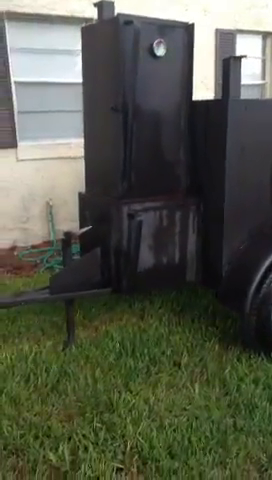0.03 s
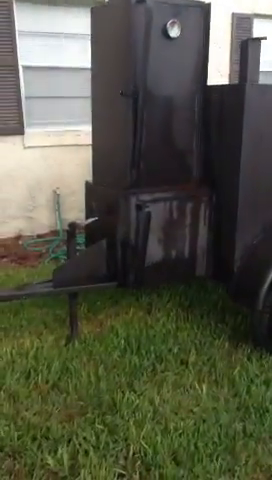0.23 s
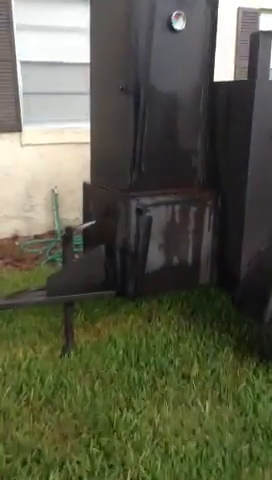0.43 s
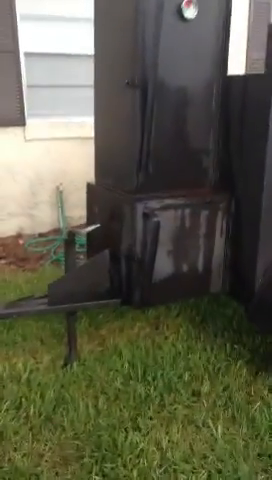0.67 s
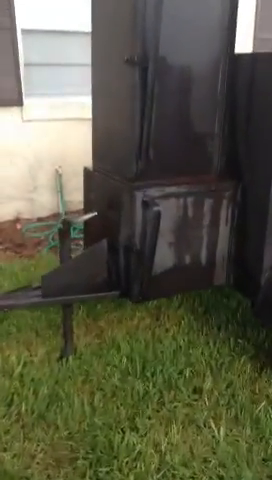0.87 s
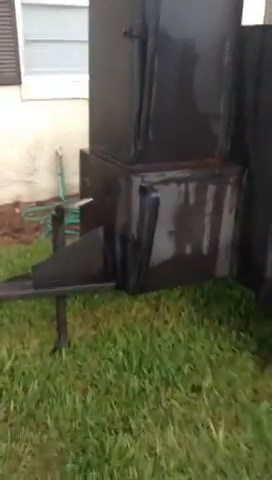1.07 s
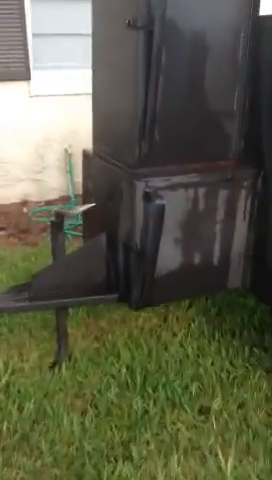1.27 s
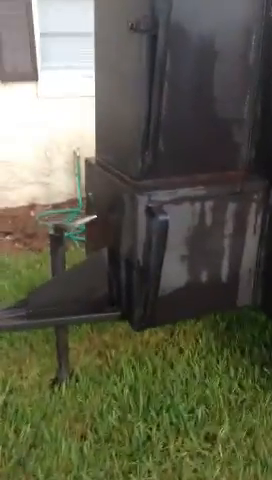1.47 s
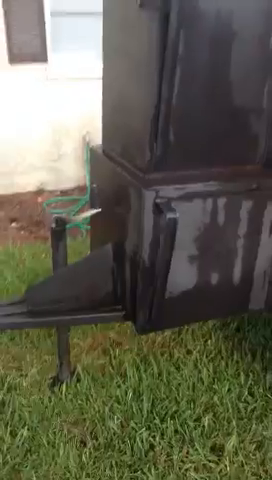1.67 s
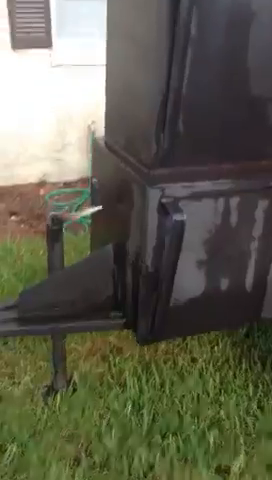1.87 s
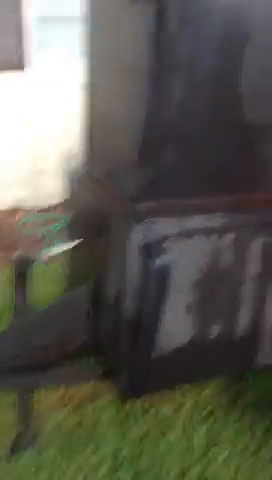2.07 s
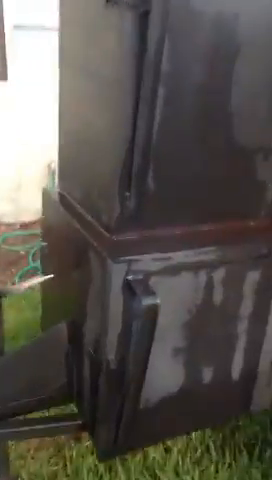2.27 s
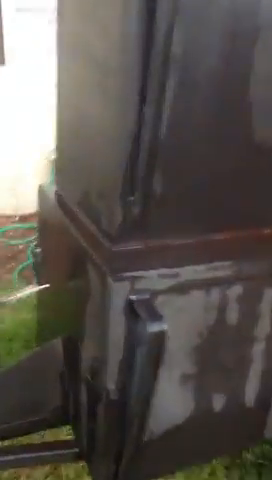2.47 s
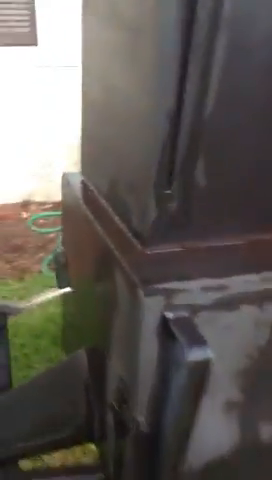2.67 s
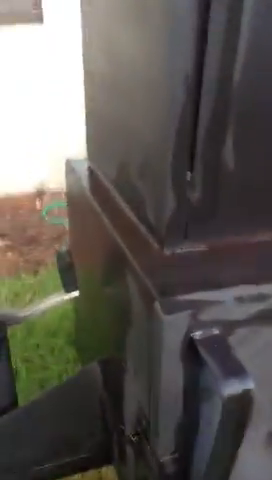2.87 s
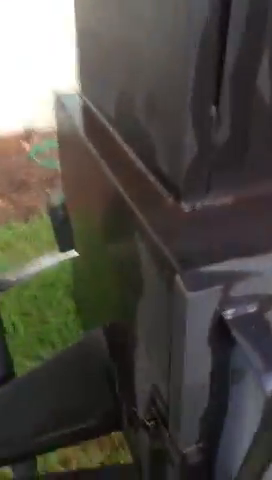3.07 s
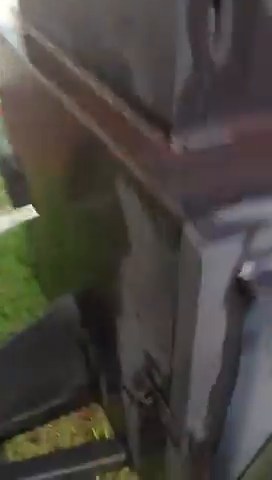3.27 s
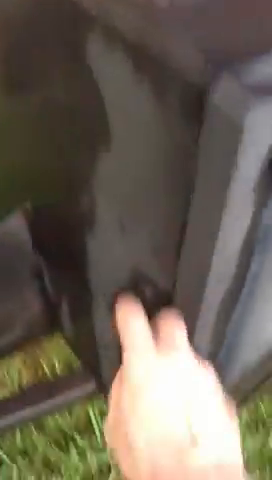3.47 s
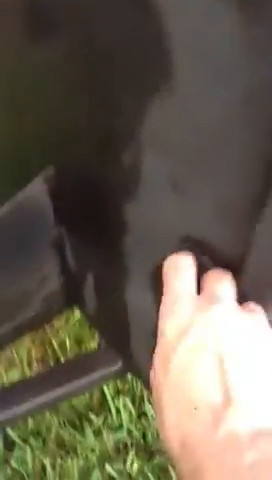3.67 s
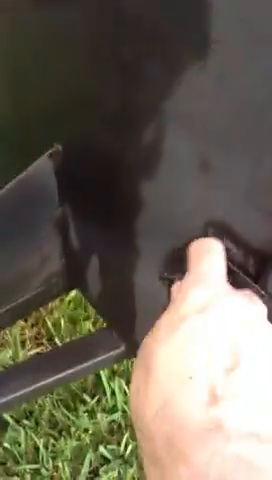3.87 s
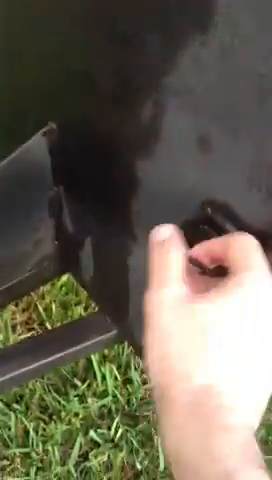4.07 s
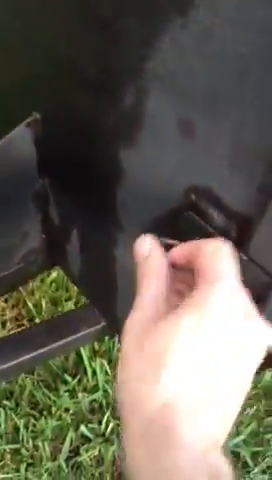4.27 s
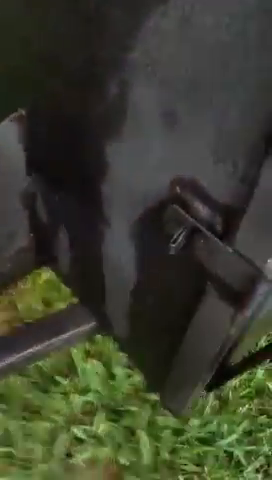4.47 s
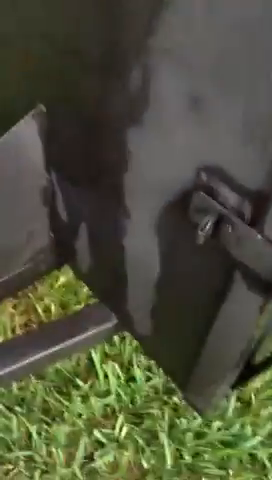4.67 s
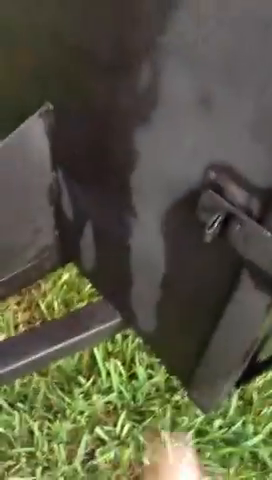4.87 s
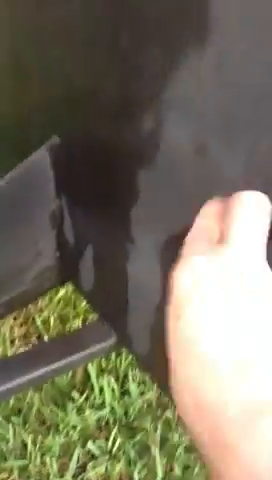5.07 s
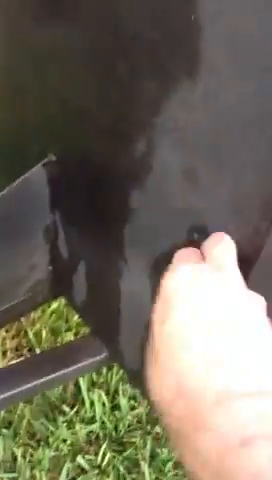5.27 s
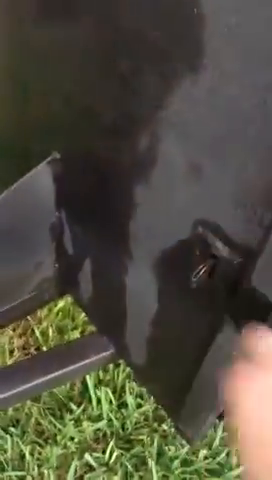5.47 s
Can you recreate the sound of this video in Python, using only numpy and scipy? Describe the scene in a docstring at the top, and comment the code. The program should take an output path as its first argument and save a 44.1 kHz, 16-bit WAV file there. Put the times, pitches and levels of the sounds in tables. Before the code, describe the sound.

A gas burner hisses evenly throughout, bright and airy, over a faint low outdoor wash. Soft swishing steps cross grass, ending in a small heel knock. Close to the microphone, a stiff steel latch ticks and scrapes, then breaks free with a loud crack and thump that rings the hollow firebox. After a pause it clanks against the loose door. Dry open air, no echo, handheld microphone.

```python
"""A gas burner hisses steadily in a steel smoker outdoors: filtered noise plus narrow pipe resonances.
Someone walks over a lawn to it: swishes of grass noise, a heel knock, short pitched noise rasps.
A hand works the firebox latch: stick-slip pulses and clicks make it grate, noise and modes ring the steel.
The latch snaps free with a crack and a filtered air push, the box rings, then the latch
clanks against the loosened door."""
import sys
import numpy as np
from scipy import signal
from scipy.fft import rfft, irfft
from scipy.io import wavfile

SR = 44100
rng = np.random.default_rng(int(sys.argv[2]) if len(sys.argv) > 2 else 0)


def to_wav(s):
    """Save 16-bit WAV."""
    ch = np.atleast_2d(s).T  # columns
    pcm = np.round(np.clip(ch, -1, 1) * 32767)  # PCM
    wavfile.write(sys.argv[1], SR, pcm.astype(np.int16))


N = 242991
TIME = np.arange(N) / SR
SNAP_S = 4.4114  # the latch snaps free

# approach to the firebox: time_s, nearness (0-1)
NEARNESS = [(0, 0), (2.2, 0.35), (3.0, 0.35), (3.7, 0.98), (5.5, 1)]


def from_db(db):
    """Decibels to amplitude gain."""
    return 10 ** (np.asarray(db) / 20)


def rms_one(x):
    """Scale to unit rms."""
    return x / np.sqrt(np.mean(x ** 2) + 1e-20)


def in_time(rows):
    """Join (time_s, value) rows by straight lines."""
    return np.interp(TIME, *np.transpose(rows))


def drift(rate_hz):
    """Random wander of unit rms: a new target rate_hz times a second, joined by lines."""
    return rms_one(np.interp(TIME * rate_hz, np.arange(2000), rng.standard_normal(2000)))


def flutter(depth_db, rate_hz):
    """Uneven gain of a loose contact, with unit rms."""
    return rms_one(from_db(depth_db * np.clip(drift(rate_hz), -2, 2)))


def swell(centre_s, half_length_s):
    """Gaussian envelope, down to 1/e at half_length_s from its centre."""
    return np.exp(-((TIME - centre_s) / half_length_s) ** 2)


def burst(start_s, decay_s, rise_s):
    """Envelope that rises quickly and dies away exponentially."""
    age_s = np.maximum(TIME - start_s, 0)
    return (1 - np.exp(-age_s / rise_s)) * np.exp(-np.minimum(age_s / decay_s, 40))


def noise(spectrum, grain_db=0):
    """Unit-rms coloured noise; grain_db spreads the sample levels into unequal tiny clicks."""
    freq_hz, density_db = np.transpose(spectrum)
    grain = from_db(grain_db * np.clip(rng.standard_normal(N), -3, 3))
    white = rng.standard_normal(N) * grain
    bins_hz = np.maximum(np.fft.rfftfreq(N, 1 / SR), 1)
    colour = from_db(np.interp(np.log(bins_hz), np.log(freq_hz), density_db))
    return rms_one(irfft(rfft(white) * colour, N))


def ring(drive, freq_hz, t60_s):
    """Two-pole mode: a unit click rings it at about height 1; the zeros block DC."""
    radius = np.exp(-np.log(1000) / (t60_s * SR))
    w = 2 * np.pi * freq_hz / SR
    return signal.lfilter([.5, 0, -.5], [1, -2 * radius * np.cos(w), radius * radius], drive + 1e-18)


def narrow_noise(freq_hz, width_hz):
    """Unit-rms noise through two cascaded resonances at one frequency, for steep skirts."""
    t60_s = np.log(1000) / (np.pi * width_hz)
    once = ring(rng.standard_normal(N), freq_hz, t60_s)
    return rms_one(ring(once, freq_hz, t60_s / 2))


def struck(modes, times_s, levels_db, tilts_db=0):
    """Each blow excites every mode of a steel part with its own strength; tilt_db favours high modes."""
    spread_db, pivot_hz = 1.5, 500
    chance = rng.standard_normal((len(times_s), len(modes)))
    out = np.zeros(N)
    for k, (freq_hz, mode_db, t60_s) in enumerate(modes):
        tilt_db = tilts_db * np.log2(freq_hz / pivot_hz)  # tilts are in dB per octave
        clicks = np.zeros(N)
        clicks[(times_s * SR).astype(int)] = from_db(levels_db + mode_db + tilt_db + spread_db * chance[:, k])
        out += (-1) ** k * ring(clicks, freq_hz, t60_s)  # alternate polarity
    return out


def outdoors():
    """Low, slightly restless neighbourhood wash, which the smoker shields close up."""
    # wash colour: freq_hz, density_db (per Hz)
    wash_colour = [(25, -43), (60, -27), (100, -5), (150, -1), (215, 5), (300, 1.5), (450, -3),
                   (1000, -1.5), (1400, -4), (2200, -9.5), (4000, -35)]
    lawn_db, shield_db = -51.5, -2
    return noise(wash_colour) * from_db(lawn_db + shield_db * in_time(NEARNESS) + 0.87 * drift(rate_hz=2.17))


def burner():
    """A gas jet hisses through its pipe; colour and resonance balance change with nearness."""
    # hiss before trim: time_s, level_db
    hiss_level = [(0.0, -42), (0.44, -42), (1.52, -41), (2.16, -42.5), (3.06, -41.5), (4.63, -44),
                  (4.72, -42.5), (5.5, -43.5)]
    # jet from the lawn: freq_hz, density_db (per Hz)
    jet_far = [(1500, -28), (2600, -9), (3400, 0.5), (4800, 0), (6400, 3), (8300, -2.5), (10200, -3.5),
               (12500, -8.5), (15500, -18.5)]
    # jet beside the firebox: freq_hz, density_db (per Hz)
    jet_near = [(1500, -37), (2600, -7.5), (3400, -2), (4600, 1.5), (7300, 1), (8300, -1.5), (9500, -3),
                (12000, -10.5), (15500, -21)]
    # pipe resonances: freq_hz, width_hz, far_db, near_db (relative to the jet)
    pipe = [(3415, 100, -15.5, -15.5), (3876, 28, -21.5, -17.5), (4305, 55, -19, -14), (4642, 30, -21, -16),
            (5398, 48, -19.5, -12), (5790, 24, -22, -16), (6160, 66, -13.5, -16.5), (6525, 80, -16, -23),
            (6782, 45, -20, -13), (7300, 120, -19, -13)]
    trim_db = -1.5
    near = np.clip(in_time(NEARNESS), 0, 1)
    hiss = np.sqrt(1 - near) * noise(jet_far) + np.sqrt(near) * noise(jet_near)
    for freq_hz, width_hz, far_db, near_db in pipe:
        sway_db = 1.6 * drift(rate_hz=4)
        hiss += narrow_noise(freq_hz, width_hz) * from_db(far_db + near * (near_db - far_db) + sway_db)
    return hiss * from_db(in_time(hiss_level) + trim_db + 0.16 * drift(rate_hz=24))


def steps():
    """Grass blades crackle softly under each foot; the last heel knocks on the ground, a damped mode."""
    # swishes: centre_s, level_db
    swishes = [(.98, -46.5), (1.17, -52), (1.743, -49), (2.05, -56), (2.518, -46)]
    # grass colour: freq_hz, density_db (per Hz)
    grass = [(150, -25), (400, 11), (1300, 19), (2500, 14), (6000, 13), (11000, 13), (15500, 10.5)]
    half_length_s = 0.067
    heel_s, heel_hz, heel_t60_s, heel_db = 2.519, 374, 0.017, -29.5
    swish = sum(from_db(level_db) * swell(centre_s, half_length_s) for centre_s, level_db in swishes)
    heel_click = 1.0 * (np.arange(N) == int(heel_s * SR))
    heel = from_db(heel_db) * ring(heel_click, heel_hz, heel_t60_s)
    return swish * noise(grass, grain_db=0.5) + heel


def short_rasps():
    """Short pitched noise rasps: shoe scuffs in the grass, and the chinks and knocks of the latch."""
    # rasps: centre_s, pitch_hz, half_length_s, level_db
    rasps = [(2.474, 1350, .016, -50), (2.521, 1230, 0.0071, -46.5), (2.544, 2800, 0.02, -49),
             (3.434, 2200, .005, -50.5), (3.53, 7200, 0.002, -35), (3.534, 3500, 0.0058, -35.5),
             (4.038, 2670, 0.011, -39), (5.09, 690, 0.019, -49), (5.172, 735, .008, -47),
             (5.253, 1160, 0.013, -39), (5.36, 980, 0.027, -45)]
    width_share = 0.3  # bandwidth / pitch
    out = np.zeros(N)
    for centre_s, pitch_hz, half_length_s, level_db in rasps:
        rasp = narrow_noise(pitch_hz, width_share * pitch_hz)
        out += from_db(level_db) * swell(centre_s, half_length_s) * rasp
    return out


def single_resonances(wander_hz=12, rise_s=0.0057):
    """Single door or firebox resonances, tapped or rubbed, ring briefly with unsteady pitch and level."""
    # rings: start_s, pitch_hz, level_db, decay_s
    rings = [(3.533, 517, -44, .03), (3.671, 517, -44, 0.034), (3.998, 518, -44, 0.076),
             (4.385, 1275, -39, 0.026), (5.081, 152.7, -35, 0.046), (5.084, 1425, -44, 0.024),
             (5.243, 500, -31, .022), (5.345, 1036, -41, 0.041), (5.482, 946, -42, 0.027)]
    out = np.zeros(N)
    for start_s, pitch_hz, level_db, decay_s in rings:
        # wander_hz holds at 1 kHz and grows as the root of pitch
        unsteady_hz = pitch_hz + wander_hz * np.sqrt(pitch_hz / 1000) * drift(rate_hz=220)
        phase = 2 * np.pi * np.cumsum(unsteady_hz) / SR
        out += from_db(level_db) * burst(start_s, decay_s, rise_s) * np.sqrt(2) * np.sin(phase)
    return out * flutter(depth_db=1.8, rate_hz=110)


def sliding():
    """Rubbing strength of the bar: swells up to each stop, then dies; the snap cuts it off."""
    # slides: stop_s, swelling_s, level_db
    slides = [(3.801, 0.016, -45), (3.929, 0.0045, -52), (4.042, 0.0045, -40), (4.411, 0.015, -27.5),
              (5.23, 0.0065, -39), (5.253, 0.016, -36.5), (5.491, 0.0034, -47)]
    release_s = 0.015
    out = np.zeros(N)
    for stop_s, swelling_s, level_db in slides:
        contact = TIME < SNAP_S if stop_s < SNAP_S + release_s else 1
        away = np.maximum((stop_s - TIME) / swelling_s, (TIME - stop_s) / release_s)
        out += from_db(level_db) * np.exp(-np.minimum(away, 20)) * contact
    return out


def stick_slip():
    """Rubbing steel catches and lets go at uneven intervals: short decaying pulses, unit rms."""
    slips_per_s, slip_decay_s = 380, 0.002
    starts_s = np.cumsum(rng.uniform(.4, 1.6, 5000)) / slips_per_s
    starts_s = np.append(0, starts_s)
    age_s = TIME - starts_s[np.searchsorted(starts_s, TIME, side="right") - 1]
    return rms_one(np.exp(-age_s / slip_decay_s))


def latch():
    """Slips and clicks gate a bright grating, a dull body and, when hard, a top bite; both ring the bar."""
    # click edges: start_s, level_db, sharpness (0-1), body_db (relative to click), decay_s
    clicks = [(3.5272, -33, 0, -8, .0016), (3.775, -45, 0, 0, .0023), (3.788, -46, 0, 10, 0.0039),
              (3.799, -30.5, 0.64, 1, .0007), (3.803, -42, 0, 2, .0013), (3.807, -42, .05, 6, 0.0015),
              (3.927, -44, 0, 4, .001), (3.959, -43, 0, -6, .0008), (3.996, -31.5, .1, -13, .0007),
              (4.026, -31.5, .2, -2, 0.0033), (4.038, -30, .7, -10, .001), (4.039, -33, .15, -3, .001),
              (4.067, -46, 0, 0, .001), (4.4046, -26, 0.23, -11, .0023), (4.408, -25, .2, -3, .0015),
              (4.421, -37, .6, -11, .0013), (5.231, -36, 0.2, 2, 0.0027), (5.2418, -39, 0.4, -6, 0.0012),
              (5.2482, -32.5, 0.83, -8, .003), (5.254, -28, .03, -2, 0.001), (5.259, -39, .05, -3, 0.00063),
              (5.272, -41, 0.2, 6, 0.0033), (5.2912, -36, 0, -3, 0.0028)]
    # hand-damped bar modes: freq_hz, level_db (relative to drive), t60_s
    bar = [(2575, -13, 0.054), (2970, -12.5, 0.079), (3340, -13, .08), (3680, -18, .06), (3885, -22, 0.053),
           (4072, -11, 0.14), (4830, -14, 0.074), (5970, -13, 0.077)]
    # grating colour: freq_hz, density_db (per Hz)
    grating_colour = [(70, -35), (350, -12), (900, 2), (2000, -19), (2650, 2.5), (3900, 7.5), (5000, -1),
                      (7000, -10), (9500, -5), (15500, -8.5)]
    # dull body colour: freq_hz, density_db (per Hz)
    body_colour = [(30, -45), (80, -33), (160, -2.5), (400, -1), (720, -2.5), (950, -11), (1400, -1.5),
                   (1950, -11.5), (2500, -4.5), (6000, -45)]
    # bite colour of the finest slips: freq_hz, density_db (per Hz)
    bite_colour = [(5000, -20), (6800, 3.5), (9000, -7), (12500, -2), (14800, -6), (15500, -20)]
    body_db, body_follows = -19, 0.53  # body of a full-scale slide; dB gained per dB of grating
    hard_db, hard_follows = -14, 1.2  # slide level of full bite; how fast softer ones dull
    bite_db = 6.5  # sharpest edge, relative to its grating
    bar_top_db = -37  # harder clicks ring the bar no louder: it is pressed tight
    rubbed_db, rubbed_width_hz = -1, 70  # bar resonances while sliding

    rubbing, slips = sliding(), stick_slip()
    grating = rubbing * slips
    body = from_db(body_db) * rubbing ** body_follows * slips
    bite = grating * np.minimum(rubbing / from_db(hard_db), 1) ** hard_follows
    for start_s, level_db, sharpness, click_body_db, decay_s in clicks:
        click = from_db(level_db) * burst(start_s, decay_s, rise_s=0.000083)
        grating = grating + click
        body = body + from_db(click_body_db) * click
        bite = bite + sharpness * click
    rasp = grating * noise(grating_colour, grain_db=4.5) + body * noise(body_colour, grain_db=4.5)
    rasp += from_db(bite_db) * bite * noise(bite_colour, grain_db=6)

    singing = rubbing * sum(from_db(mode_db + rubbed_db) * narrow_noise(freq_hz, rubbed_width_hz)
                            for freq_hz, mode_db, _ in bar)
    times_s, levels_db = np.transpose(clicks)[:2]
    return rasp + singing + struck(bar, times_s, np.minimum(levels_db, bar_top_db))


def knocks():
    """Each latch knock clacks; door (shudder, modes) and firebox (hollow boom, modes) share its force."""
    # blows: start_s, force_db, door_share (0-1), tilt_db (per octave; hardness)
    blows = [(3.532, -48.5, 0.75, 0), (3.802, -50, 0.66, 4), (3.825, -51.5, .3, 1),
             (4.036, -42.5, .65, -2.5), (4.068, -55, 0, 9), (4.369, -52.5, 0, -4.5), (4.413, -37.5, 0.2, 2),
             (5.08, -48, 0.4, -1), (5.166, -50, 0.7, -1), (5.244, -34, 0.83, 0),
             (5.2717, -41.5, 0.98, -1.5), (5.358, -53.5, 0.84, 3), (5.379, -46.5, 0.8, -3),
             (5.484, -55, .95, -5)]
    # door modes: freq_hz, level_db (relative to force), t60_s
    door = [(229, -11, .7), (296, -10, 0.74), (351, -7, .6), (431, 1.5, 0.35), (517, 3.5, 0.4),
            (571, -13, .45), (694, -5, 0.45), (760, 0, .22), (912, -5, .3), (1023, -3.5, 0.38),
            (1072, -13, 0.69), (1176, -3.5, 0.18), (1438, -2.5, 0.21), (1490, -11, 0.15)]
    # firebox modes: freq_hz, level_db (relative to force), t60_s
    firebox = [(151.5, -0.5, 1.02), (177.7, -6.5, 1.3), (204.6, -2, 1.34), (260, -0.5, 0.81),
               (400, -8.5, .7), (483, 2, 0.38), (632, -16, 0.6), (893, -9, 0.45), (1275, -12, 0.38)]
    # clack colour: freq_hz, density_db (per Hz)
    clack_colour = [(50, -40), (150, -10), (300, 3), (480, 2), (750, 7), (900, -7), (1400, -6), (1900, -5),
                    (3000, -8), (6000, -35)]
    # door shudder colour: freq_hz, density_db (per Hz)
    shudder_colour = [(90, -24), (200, 1), (330, 2), (500, -5), (720, -9), (900, -12), (1300, -14),
                      (1800, -24), (4000, -25), (7000, -45)]
    # firebox boom colour: freq_hz, density_db (per Hz)
    boom_colour = [(80, -22), (140, 5), (230, -8), (310, -11), (480, -9), (700, -22), (2000, -36)]

    times_s, force_db, share, tilt_db = np.transpose(blows)
    share = np.clip(share, .01, .99)
    door_db = force_db + 20 * np.log10(share)
    box_db = force_db + 20 * np.log10(1 - share)

    def bursts(levels_db, gain_db, decay_s, rise_s):
        """Sum one envelope per blow."""
        return sum(from_db(level_db + gain_db) * burst(start_s, decay_s, rise_s)
                   for start_s, level_db in zip(times_s, levels_db))

    clack = bursts(force_db, gain_db=-.5, decay_s=0.019, rise_s=0.00028) * noise(clack_colour, grain_db=-1)
    shudder = bursts(door_db, gain_db=-11.5, decay_s=0.21, rise_s=0.005) * noise(shudder_colour, grain_db=7.0)
    boom = bursts(box_db, gain_db=-8.5, decay_s=0.18, rise_s=0.004) * noise(boom_colour)
    ringing = struck(door, times_s, door_db, tilt_db) + struck(firebox, times_s, box_db, tilt_db)
    return clack + flutter(depth_db=3, rate_hz=70) * (shudder + boom) + ringing


def snap(thump_db=-4, crack_db=-9.0, door_hz=172, door_q=1.5, soft_hz=2500):
    """The freed door jumps: a noise crack and one air push through a low-Q, second-order high-pass."""
    push_s, crack_s = .00085, .0005
    age = TIME - SNAP_S
    push = -np.clip(1.25 - (age / push_s) ** 2, 0, 1) * (age >= 0)
    push = signal.sosfilt(signal.butter(1, soft_hz, fs=SR, output="sos"), push + 1e-18)
    w = 2 * np.pi * door_hz
    thump = signal.lfilter(*signal.bilinear([1, 0, 0], [1, w / door_q, w * w], SR), push)
    crack = rng.standard_normal(N) * burst(SNAP_S, crack_s, rise_s=crack_s / 10)
    return from_db(thump_db) * thump + from_db(crack_db) * crack


def scene():
    """Open air with no echo, identical in both channels."""
    walk = steps() + short_rasps()
    firebox_sounds = single_resonances() + latch() + knocks() + snap()
    mono = outdoors() + burner() + walk + firebox_sounds
    return np.array([mono, mono])


def record(dry):
    """The microphone loses the deep bass and the top is cut steeply."""
    bass_cut_hz, top_cut_hz = 45, 15400
    thin = signal.sosfilt(signal.butter(2, bass_cut_hz, "high", fs=SR, output="sos"), dry)
    return signal.sosfilt(signal.ellip(10, .2, 80, top_cut_hz, fs=SR, output="sos"), thin)


dry = scene()
out = record(dry)
to_wav(out)
```